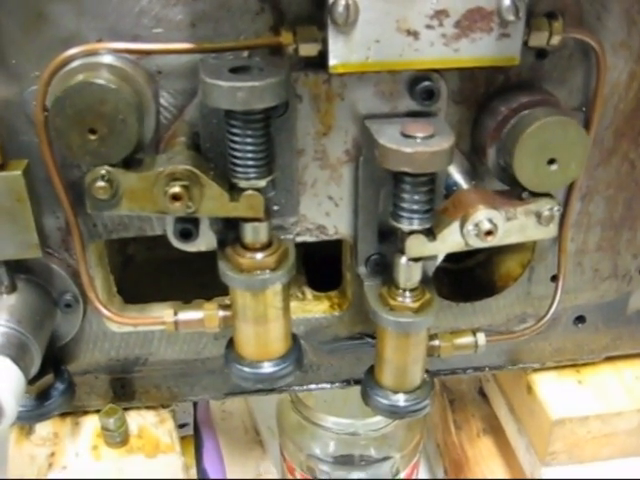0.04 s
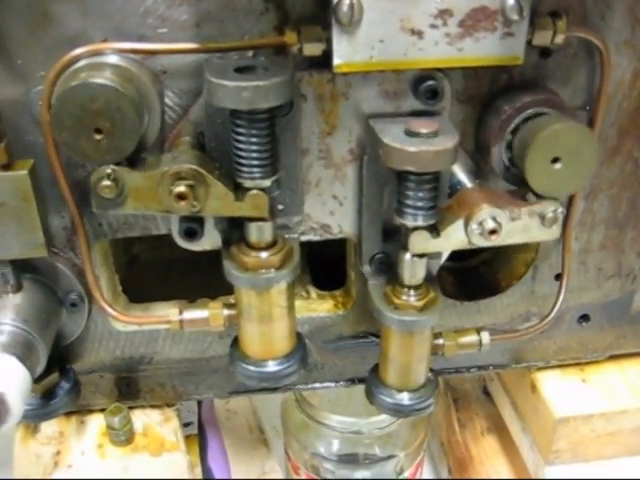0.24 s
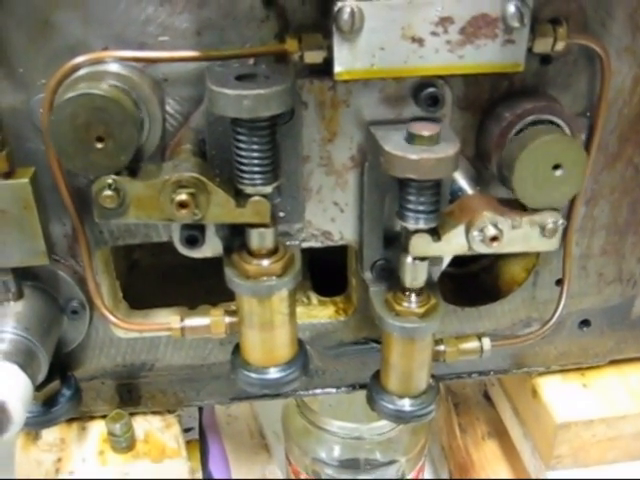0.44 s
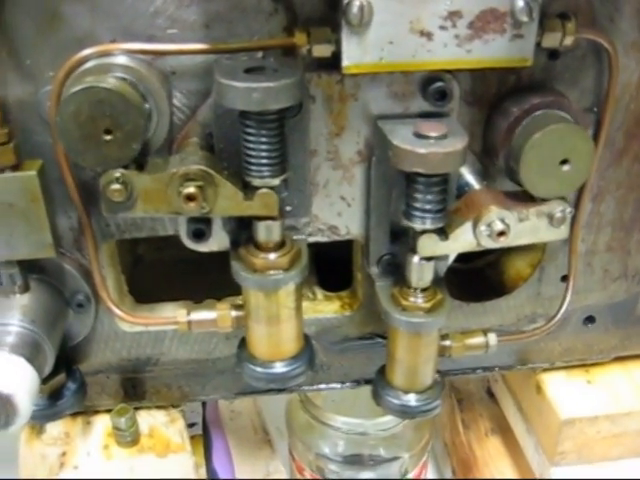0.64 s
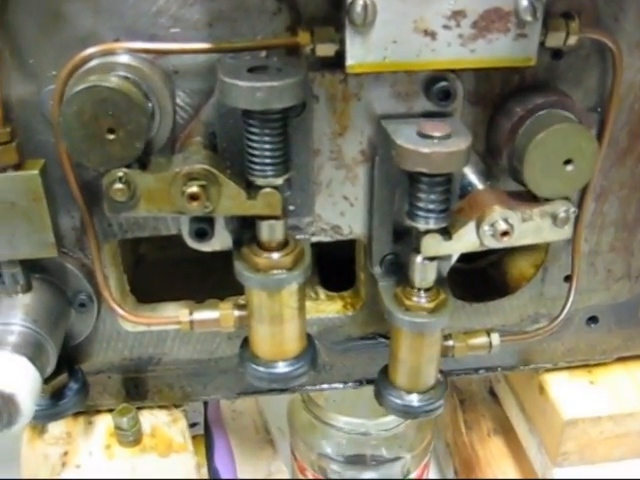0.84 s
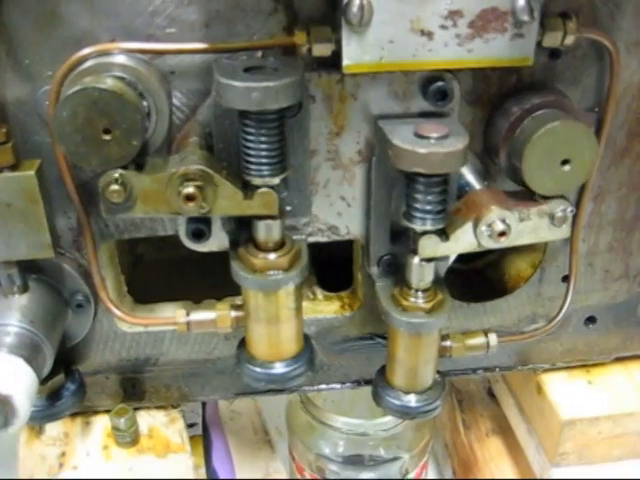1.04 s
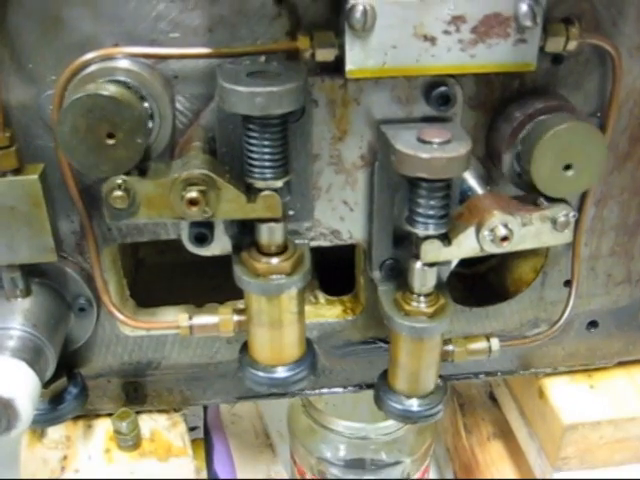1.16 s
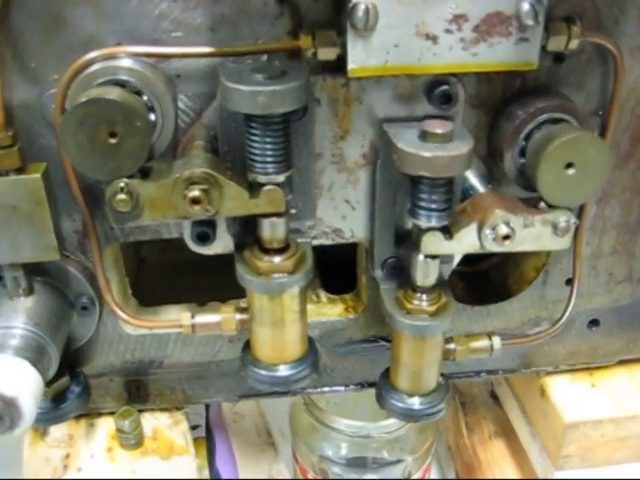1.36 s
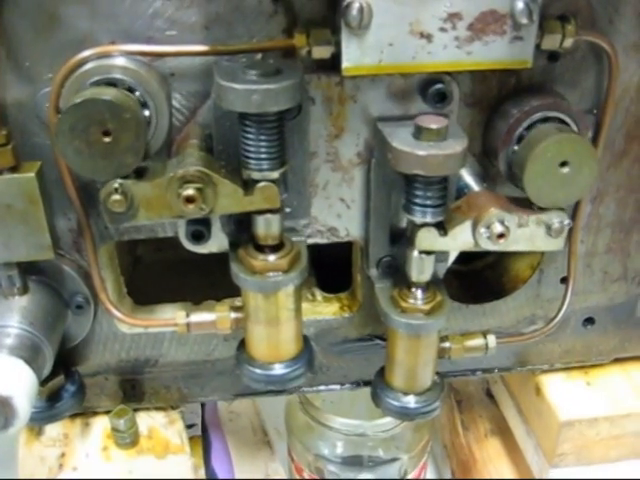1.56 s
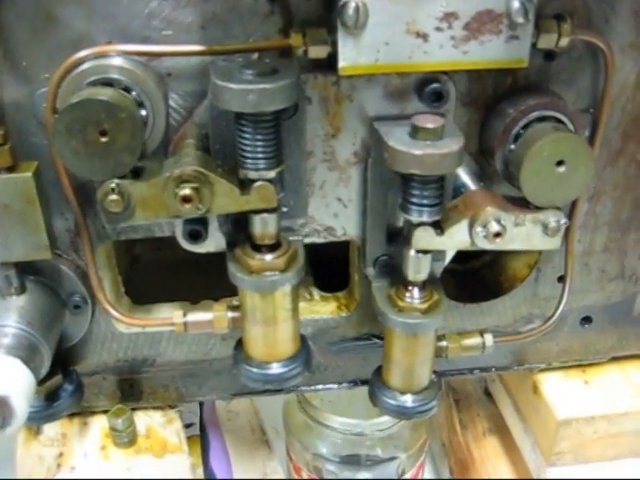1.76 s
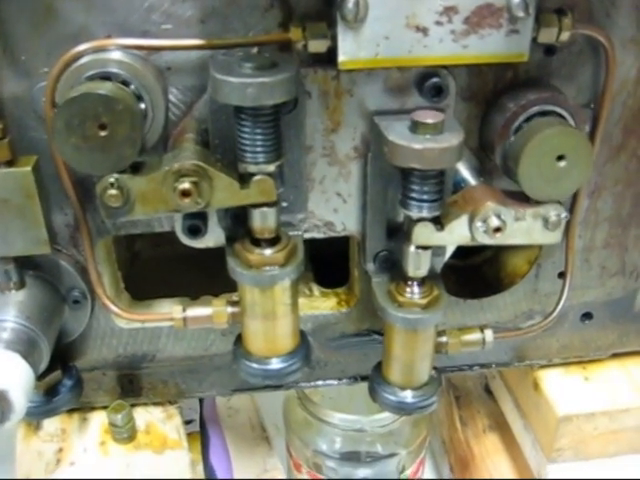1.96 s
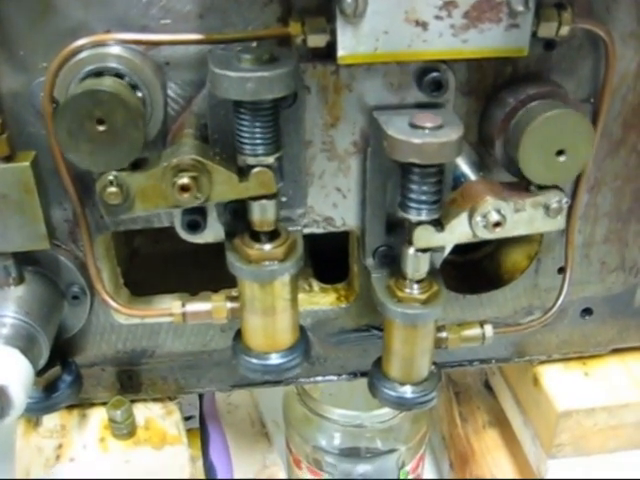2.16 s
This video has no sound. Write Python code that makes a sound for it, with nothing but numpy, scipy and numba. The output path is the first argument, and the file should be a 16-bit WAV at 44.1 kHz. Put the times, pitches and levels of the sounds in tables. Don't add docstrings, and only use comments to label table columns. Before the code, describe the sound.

Metal levers of a lathe oil pump clack unevenly, with short scrapes in a hard-walled workshop.

```python
import sys
import numpy as np
from scipy import signal
from scipy.fft import rfft, irfft
from scipy.io import wavfile
from scipy.ndimage import uniform_filter1d
from numba import njit

SR = 44100
rng = np.random.default_rng(int(sys.argv[2]) if len(sys.argv) > 2 else 0)


def field_ratio(decibels):
    return 10 ** (np.asarray(decibels, dtype=float) / 20)


def to_wav(s):
    ch = np.atleast_2d(s).T
    pcm = np.round(np.clip(ch, -1, 1) * 32767)
    wavfile.write(sys.argv[1], SR, pcm.astype(np.int16))


N = 97020

SNAP_DB, SNAP_T60_S = 5, .0043


def unit(x):
    return x / np.sqrt(np.mean(x ** 2))


def ring(hz, t60, secs=.6):
    t = np.arange(int(secs * SR)) / SR
    return np.sin(2 * np.pi * hz * t) * np.exp(-np.log(1000) * t / max(t60, 1e-3))


def burst(hz, turns, secs=.1):
    u = np.arange(int(secs * SR)) / SR * hz / turns
    return np.sin(2 * np.pi * turns * u) * u * np.exp(1 - u) * np.exp(-u ** 2 / 20)


def swell(count, rise_s):
    return 1 - np.exp(-(np.arange(count) / SR / rise_s) ** 2)


def add(out, start_s, x):
    i = int(start_s * SR)
    out[i:i + len(x)] += x[:max(len(out) - i, 0)]


def colour(points):
    p = np.array(points, float)
    log_hz = np.log(np.arange(N // 2 + 1) * SR / N + 1)
    gain = field_ratio(np.interp(log_hz, np.log(p[:, 0]), p[:, 1], left=-60, right=-60))
    return unit(irfft(rfft(rng.standard_normal(N)) * gain, N))


def walk(rate):
    k = int(SR / rate)
    return uniform_filter1d(np.repeat(rng.standard_normal(N // k + 1), k), k)[:N]


@njit
def svf(x, hz, width):
    y, band, low = np.empty(len(x)), 0., 0.
    for i in range(len(x)):
        g, k = np.tan(np.pi * hz[i] / SR), width / hz[i]
        v = (band + g * (x[i] - low)) / (1 + g * (g + k))
        band, low, y[i] = 2 * v - band, low + 2 * g * v, k * v
    return y


def steady_band(x, hz, width):
    return unit(svf(x, np.full(N, 1. * hz), 1. * width))


@njit
def follow(x, up, down):
    y, e = np.empty(len(x)), 0.
    for i in range(len(x)):
        e += (abs(x[i]) - e) * (up if abs(x[i]) > e else down)
        y[i] = e
    return y


def camera(t):
    # hz, level_db per Hz
    hiss = [(2000, 1), (3500, -6.5), (5500, -2.5), (7000, -7.5), (8200, -5), (9200, -1), (10800, 2.5),
            (12200, 6)]
    # hz, level_db
    lines = [(9473, -63), (11041, -56)]
    # hz within a frame, slip_hz from frame to frame, level_db
    tones = [(7569.3, 0, -41), (7844.3, 22.2, -48)]
    frame_hz, hiss_db = 30, -38
    inside = np.mod(t, 1 / frame_hz)
    whine = sum(field_ratio(db) * np.sin(2 * np.pi * (hz * inside + slip * t)) for hz, slip, db in tones)
    steady = sum(field_ratio(db - 2.5) * np.sin(2 * np.pi * hz * t) for hz, db in lines)
    return np.sqrt(2) * whine + steady + field_ratio(hiss_db + .5 * walk(14)) * colour(hiss)


def workshop_air():
    # hz, level_db per Hz
    air = [(15, -49), (25, -16.5), (247, -8.5), (511, -5.5), (643, -5), (941, 2.5), (1250, -4.5),
           (1670, -1), (2400, -37), (3120, -76), (5280, -120)]
    air_db, flicker_db = -43, 1.17
    return field_ratio(air_db + flicker_db * walk(9.5)) * colour(air)


def drones():
    # hz, width_hz, level_db
    bands = [(203, 17.5, -62), (387.6, 6.7, -63), (840, 28, -75.5), (1004, 78, -62)]
    out = np.zeros(N)
    for hz, width, db in bands:
        out += field_ratio(db + 2.4 * walk(4.76)) * steady_band(rng.standard_normal(N), hz, width)
    return out


def rub(t):
    # start_s, level_db, centre_hz
    effort = [(0, -71, 890), (0.118, -55, 1540), (.22, -34.5, 1970), (.3, -33, 2000), (.39, -38, 1940),
              (.465, -31, 2530), (0.531, -31, 2600), (.6, -38, 2480), (.7, -50.5, 2500), (0.949, -56, 2000),
              (1.15, -51.5, 1830), (1.24, -39, 1900), (1.46, -44.5, 2000), (1.54, -43, 4500),
              (1.62, -74, 2500), (2.029, -52, 1880), (2.129, -35, 1930), (2.2, -40, 1800)]
    # hz, width_hz, level_db
    casting = [(950, 350, -3), (1400, 400, -8), (4300, 2200, -5), (385, 40, -17)]
    grains_per_s, spread_db, width_hz, rub_db = 5400, 1.2, 750., 3
    start_s, level_db, centre_hz = np.array(effort, float).T
    slips = (rng.random(N) < grains_per_s / SR) * rng.standard_normal(N)
    slips = slips * field_ratio(spread_db * rng.exponential(size=N))
    grains = unit(slips) * field_ratio(2.7 * walk(39.64))
    centre = np.interp(t, start_s, centre_hz)
    x = unit(svf(svf(grains, centre, width_hz), centre, 2 * width_hz))
    for hz, width, db in casting:
        x = x + field_ratio(db) * steady_band(grains, hz, width)
    return unit(x) * field_ratio(rub_db + np.interp(t, start_s, level_db))


def chatter(x, c):
    depth, fade_s = .3, .002
    k = depth * c * (np.abs(c) > 1.2) * np.exp(-np.arange(len(c)) / SR / fade_s)
    k[0] = 1
    return signal.fftconvolve(x, k)[:len(x)]


def clacks():
    # start_s, level_db, pitch_hz, ring_t60_s
    blows = [(.1635, -25, 1520, 0.0085), (.3245, -22.5, 1920, .015), (.4213, -17, 1100, 0.0076),
             (.4320, -28.5, 834, 0.12), (.4380, -30, 2200, .02), (.4218, -17.5, 2350, 0.027),
             (.4235, -9, 2200, 0.012), (.4262, -21.5, 2215, 0.029), (.4295, -18, 2710, 0.0092),
             (.4500, -7.5, 1680, 0.0073), (.4510, 1, 2767, 0.024), (.4548, -3.5, 2600, 0.0123),
             (0.663, -22, 1850, 0.0098), (0.667, -31, 990, 0.0087), (.7740, -6, 1454, 0.015),
             (0.7774, -7, 2050, 0.0082), (1.218, -34, 2100, 0.0085), (1.412, -28.5, 740, 0.016),
             (1.4772, -8, 1750, .016), (1.482, -19.5, 1850, 0.0099), (1.728, -33.5, 1130, 0.022),
             (1.7632, -5.5, 1430, 0.011), (1.7660, -19.5, 734, .02), (1.7690, -11.5, 1720, 0.013),
             (1.7735, -19.5, 2360, 0.026), (2.164, -26.5, 1870, 0.014), (2.183, -28.5, 1740, 0.0067)]
    # hz, level_db, t60_s
    modes = [(702, -6.5, 0.04), (807, -17.5, 0.12), (988, 1, 0.022), (1130, -7, 0.063),
             (1296, -14.5, 0.075), (1370, -20, 0.019), (1620, -1.5, 0.028), (1648, -3, 0.015),
             (2000, 2.5, 0.024), (2200, -5, 0.052), (2474, -23, 0.0084), (2793, -8.5, 0.052),
             (3440, 0, 0.015), (4500, -13.5, 0.026)]
    body_db, scatter_db, damping = -13, 2, .75
    push_s, crack_db, crack_band_hz = .0012, -13, [2000, 6000]
    close, snaps = np.zeros((2, N))
    luck = rng.standard_normal((len(blows), 600))
    crack_filter = signal.butter(2, crack_band_hz, "band", fs=SR)
    for (s, db, hz, t60), c in zip(blows, luck):
        body = 0
        for k, (f, d, mode_t60) in enumerate(modes):
            mode_db = body_db + d - 4.06 * abs(np.log2(f / hz)) + scatter_db * np.tanh(c[k])
            mode = ring(f * (1 + 0.014 * c[k + 40]), damping * mode_t60, .2)
            body = body + field_ratio(mode_db) * np.sign(c[k + 20]) * mode
        x = burst(hz, t60 * hz / 14, .2) + chatter(body, c[300:])
        x = x * swell(len(x), push_s)
        crack = signal.lfilter(*crack_filter, c[100:300]) * np.exp(-np.arange(200) / SR / .0015)
        x[20:220] += field_ratio(crack_db) * crack
        snap = ring(hz, SNAP_T60_S, .02) + .4 * ring(0.67 * hz, SNAP_T60_S, .02)
        add(close, s, field_ratio(db + 7) * x / np.abs(x).max())
        add(snaps, s, field_ratio(db + 1.5 + SNAP_DB) * snap)
    return close, snaps


def ticks():
    # start_s, level_db, pitch_hz, after_ring_db
    taps = [(0.2049, -12, 4020, -6), (0.363, -14.5, 4150, -19.5), (0.4532, -31, 9000, 9),
            (0.4523, -2, 4550, -1), (1.006, -32.5, 3760, -15), (1.2834, -7.5, 3950, -11),
            (1.522, -30, 4720, -10), (1.5363, -29, 3820, -12), (1.543, -26, 5600, -21),
            (1.624, -29, 9100, -37), (1.7428, -20.5, 4500, -27), (1.7442, -22.5, 3040, -25)]
    # hz, level_db, t60_s
    modes = [(1380, -2, .016), (1600, -1, .018), (1850, 0, .02), (2150, -4, .016), (2900, -10, .012),
             (3500, -2, .018), (3900, -1, .018), (4400, -5, .014), (5200, -10, .01), (6200, -11, .009),
             (8400, -14, .007)]
    lever_db, turns, low_hz, room_db = -4, 0.93, 1100, -3.5
    close, snaps = np.zeros((2, N))
    luck = rng.standard_normal((len(taps), 340))
    low_cut = signal.butter(2, low_hz, "high", fs=SR)
    for (s, db, hz, after_db), c in zip(taps, luck):
        x = burst(hz, turns)
        x = x + 0.33 * burst(min(1.458 * hz, 11000), 2.3)
        x = x + 0.34 * burst(min(2.123 * hz, 11000), 2.6)
        lever = 0
        for k, (f, d, t60) in enumerate(modes):
            mode_db = lever_db + after_db + d + 0.71 * np.tanh(c[k])
            mode = ring(f * (1 + 0.06 * c[k + 12]), t60, .1)
            lever = lever + field_ratio(mode_db) * np.sign(c[k + 24]) * mode
        x = signal.lfilter(*low_cut, x + swell(len(x), 0.0019) * chatter(lever, c[40:]))
        snap = ring(hz, SNAP_T60_S, .02) + 0.34 * ring(2180, 1.9 * SNAP_T60_S, .02)
        add(close, s, field_ratio(db + 9) * x / np.abs(x).max())
        add(snaps, s, field_ratio(db + 6.5 + SNAP_DB + room_db) * snap)
    return close, snaps


def room(x):
    t60_s, top_t60_s, level_db = 0.71, 0.36, -9.5
    gap_s, rise_s, low_hz = 0.002, 0.022, 632
    t = np.arange(SR) / SR
    noise = signal.lfilter(*signal.butter(3, low_hz, "high", fs=SR), rng.standard_normal(SR))
    low = signal.lfilter(*signal.butter(2, 2500, fs=SR), noise)
    tail = low * np.exp(-np.log(1000) * t / t60_s)
    tail = tail + (noise - low) * np.exp(-np.log(1000) * t / top_t60_s)
    tail = tail * np.clip((t - gap_s) / rise_s, 0, 1)
    return field_ratio(level_db) * signal.fftconvolve(x, tail / np.sqrt(np.sum(tail ** 2)))[:N]


def after_ring(t):
    hz, from_s, to_s, level_db = 501, 1.49, 2.08, -46.5
    on = np.clip((t - from_s) / 0.01, 0, 1) * np.clip((to_s - t) / 0.017, 0, 1)
    return field_ratio(level_db + 3.5 * walk(8)) * on * np.sin(2 * np.pi * hz * t + .5 * walk(10))


def scene():
    t = np.arange(N) / SR
    clack_close, clack_snaps = clacks()
    tick_close, tick_snaps = ticks()
    hits = clack_close + tick_close
    snaps = clack_snaps + tick_snaps
    near = hits + room(snaps + 0.28 * hits) + rub(t) + after_ring(t)
    near = signal.sosfilt(signal.butter(2, 233, "high", fs=SR, output="sos"), near)
    add(near, .4505, field_ratio(-35) * np.hanning(90))
    mono = near + workshop_air() + drones() + camera(t)
    return np.array([mono, 0 * mono])


def roll_off(x):
    return signal.sosfilt(signal.butter(12, 12750, fs=SR, output="sos"), x)


def record(dry):
    duck_at_db, ratio, attack_s, release_s = -14.5, 7.5, 0.0038, 0.039
    level = follow(dry[0], 1 / (attack_s * SR), 1 / (release_s * SR))
    gain = np.minimum(field_ratio(duck_at_db) / (level + 1e-9), 1) ** (1 - 1 / ratio)
    x = np.clip(dry * gain, -.84, .84)
    x = signal.sosfilt(signal.cheby2(8, 60, 13350, fs=SR, output="sos"), x)
    return roll_off(x)


dry = scene()
out = record(dry)
to_wav(out)
```